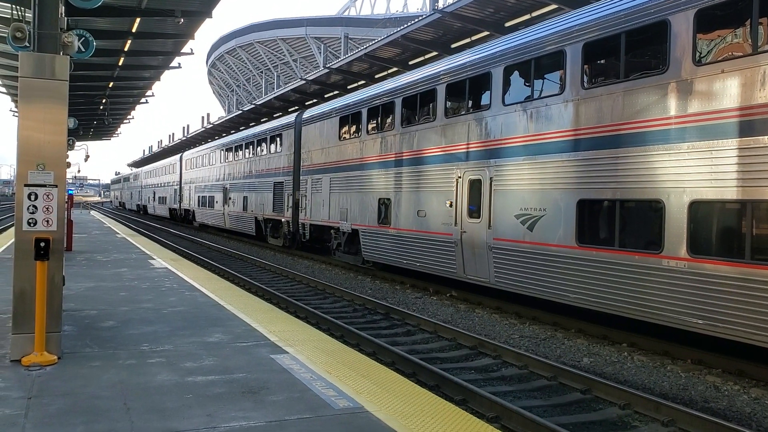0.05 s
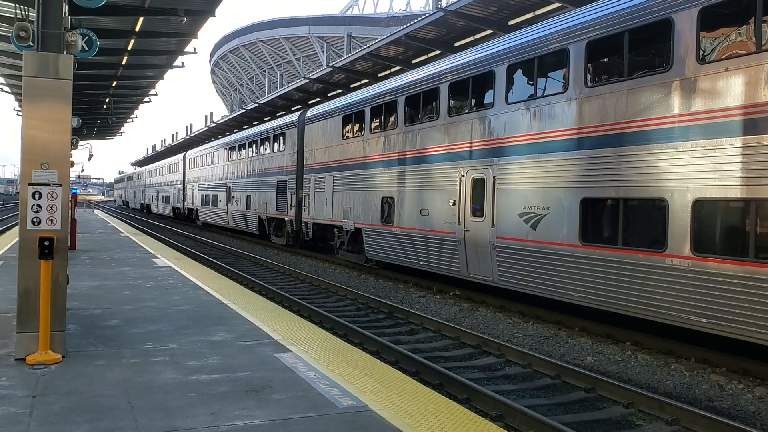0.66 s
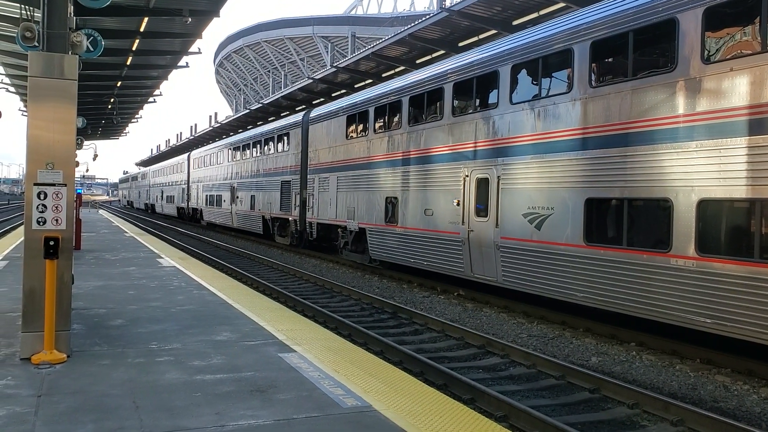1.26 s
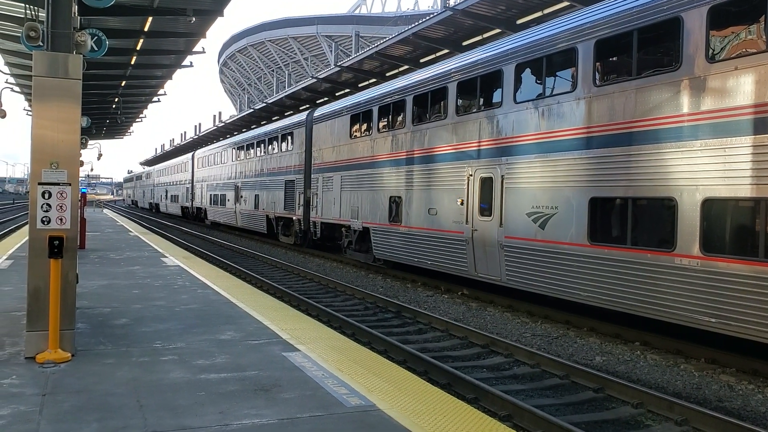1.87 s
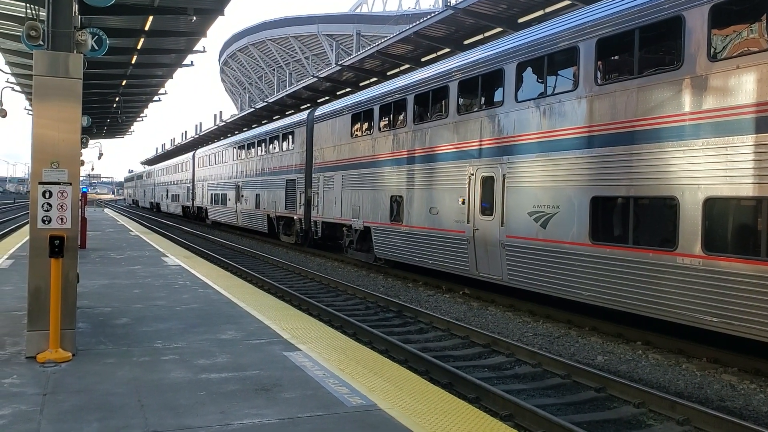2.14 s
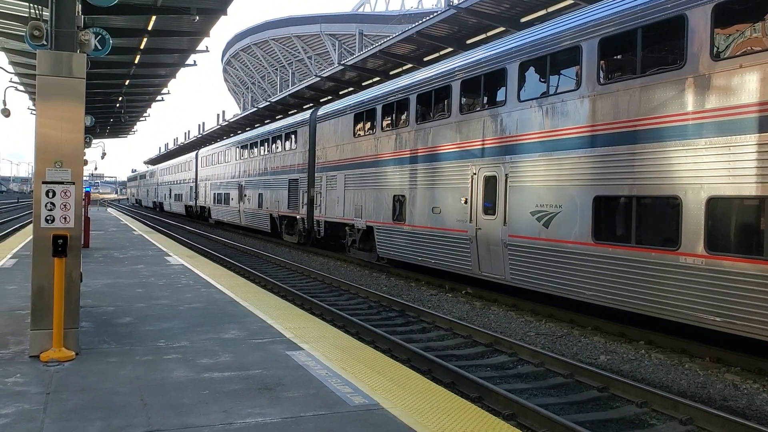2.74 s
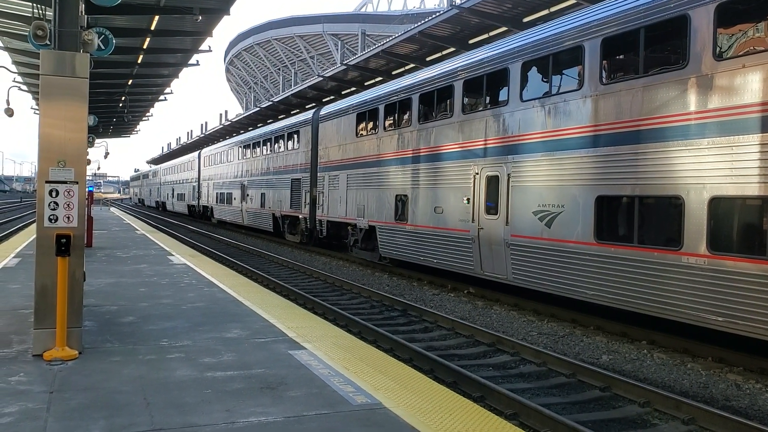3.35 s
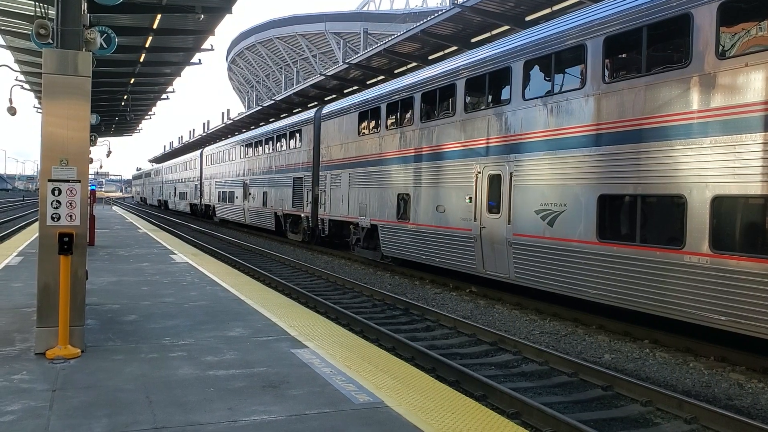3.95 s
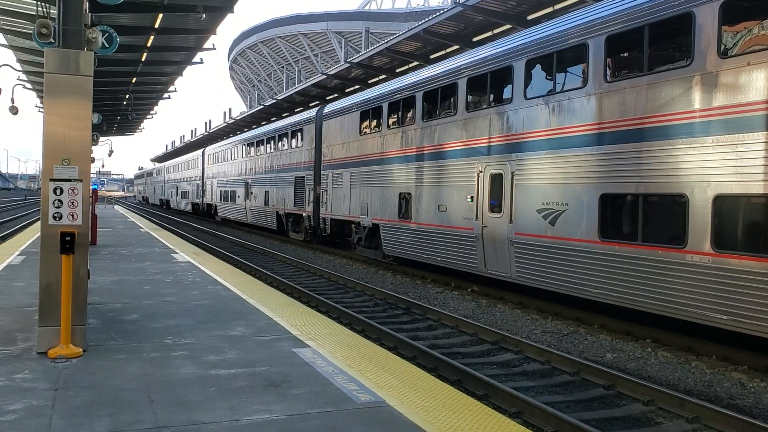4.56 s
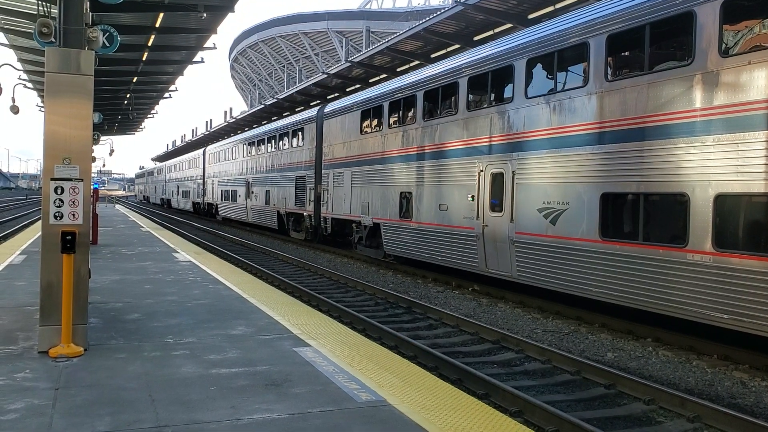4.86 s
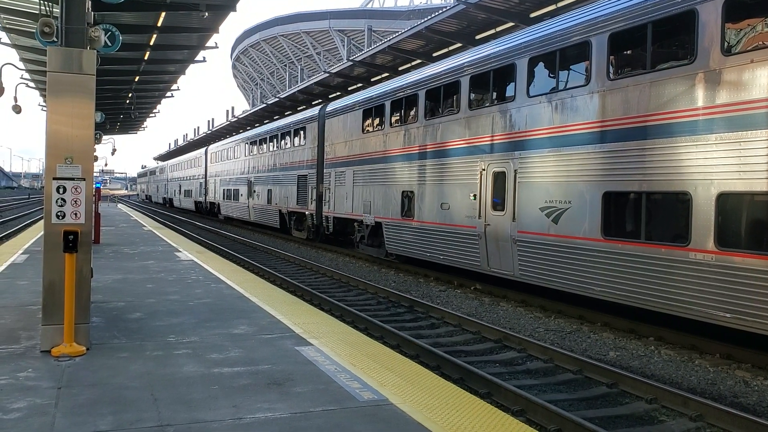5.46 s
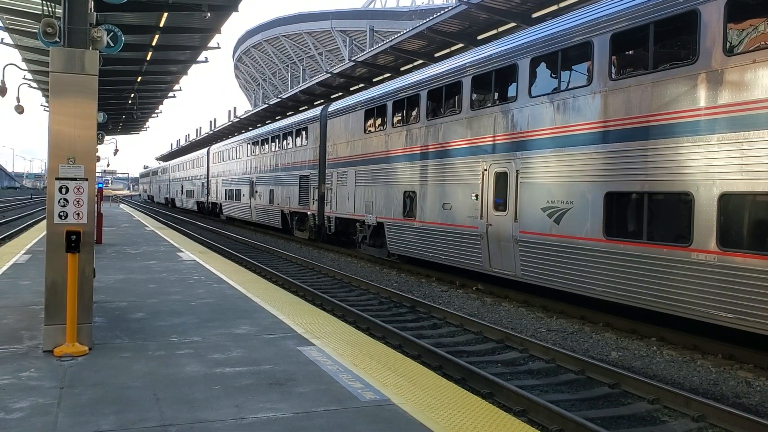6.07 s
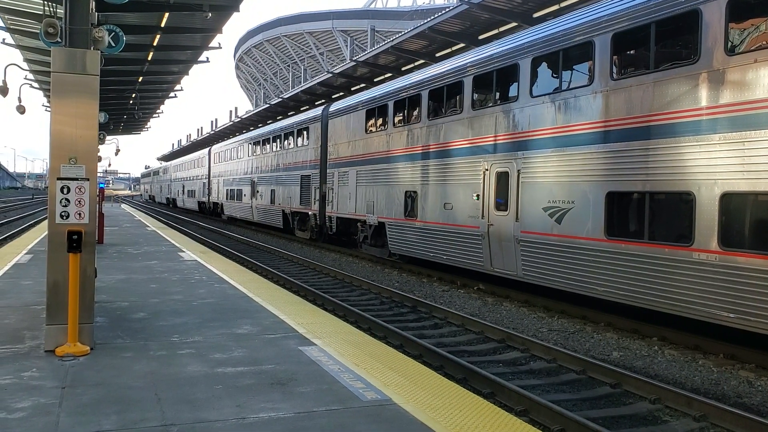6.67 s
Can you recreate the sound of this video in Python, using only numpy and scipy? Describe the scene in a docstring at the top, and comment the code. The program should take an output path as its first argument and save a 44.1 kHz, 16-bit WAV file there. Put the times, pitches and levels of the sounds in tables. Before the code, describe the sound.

An idling diesel train throbs and hums steadily while a whistling air leak fades away and a valve gives a few short spits.

```python
"""Two diesel engines of a passenger train idle beside a roofed station platform.
Their exhaust pulses beat in the bass, under the rush, hum and whine of the cars' blowers.
To the left, leaking compressed air hisses and whistles in a cavity, fading to a sizzle at the seal
as the pressure falls. A valve spits and vents, ringing its body. A thin squeal comes and goes."""
import sys
import numpy as np
from scipy import signal
from scipy.fft import rfft, irfft
from scipy.io import wavfile

SR = 44100
rng = np.random.default_rng(int(sys.argv[2]) if len(sys.argv) > 2 else 0)


def digitize_waveform(pressure):
    """Quantize a signal to 16-bit integers and store it at the path in sys.argv[1].

    Rows of a 2-D input are taken as channels; values are limited to [-1, 1].
    """
    field = np.atleast_2d(pressure).T
    bounded = np.clip(field, -1, 1)
    quanta = np.round(bounded * 32767).astype(np.int16)
    wavfile.write(sys.argv[1], SR, quanta)


N = 295778
T = np.arange(N) / SR
HZ = np.maximum(np.arange(N // 2 + 1) * SR / N, 1)


# Near engine, uneven cylinders: multiple of cycle rate, level/dB
EXHAUST_ORDERS = [(7, -43), (8, -36.5), (11, -26.3), (12, -32), (13, -31.5), (15, -43), (17, -46)]

def engines(cycle_hz=5.9973, firing_hz=56.705, first_throb_s=.0969, jitter_s=.0002):
    """Exhaust pulses swell once a cycle and beat against the second engine's firing note."""
    clock_s = T - first_throb_s + jitter_s * drift(.93)
    exhaust = sum(from_db(db + .7 * drift(2)) * np.cos(2 * np.pi * order * cycle_hz * clock_s)
                  for order, db in EXHAUST_ORDERS)
    second_engine = from_db(-24.5 + drift(1.3)) * np.cos(2 * np.pi * firing_hz * clock_s)
    return np.sqrt(2) * (exhaust + second_engine) * pan(lean_db=.9)


# Blower rumble and rush: f/Hz, density/(dB per Hz)
BLOWER_RUMBLE = [(20, -72), (36, -51), (55, -49), (85, -46.5), (115, -51.5), (145, -54), (210, -52.5),
                 (270, -59), (400, -63), (520, -65.5), (680, -66), (1000, -75), (1600, -84.5)]
BLOWER_RUSH = [(300, -84), (900, -71.5), (1500, -73), (2100, -77), (2800, -82), (3400, -81.5),
               (4500, -92.5), (6000, -96), (7800, -106), (10800, -105), (12000, -121), (15500, -122)]
# Transformers, motors, fan blades: f/Hz, level/dB, wander/Hz
MACHINE_HUMS = [(59.87, -33, 0.057), (71.6, -41, 1.36), (180.1, -42, 0.13), (182.7, -39, 0.438),
                (215.9, -41.5, 0.39), (236.6, -45, .4), (295.8, -48.5, 0.32), (344.5, -50, 0.61),
                (376.8, -53, 1.21), (388, -52.5, 0.34), (412.7, -50, 0.54), (657.6, -55.5, 0.805),
                (722, -67, 0.51), (1271, -60, 1.61)]
# Blower whines: f/Hz, width/Hz, level/dB
BLOWER_WHINES = [(2401, 2.5, -63), (2431, 4, -60.3), (2579, 3, -69), (2638, 3, -67.5), (2934, 8, -71)]
# Balance of the cars' sound: f/Hz, left minus right/dB
CAR_LEAN = [(60, 0.33), (110, 0.46), (200, 2.5), (380, 2.5), (700, 5.5), (1290, 10.4), (2380, 6),
            (4400, 10.7), (8120, 32), (15000, 7.1)]

def blowers(surge_db=.55, waver_db=1.0):
    """Fans under the cars: broad rush, wavering hums, thin whines."""
    density = np.hypot(spectrum(BLOWER_RUMBLE), spectrum(BLOWER_RUSH))
    rush = noise(density, CAR_LEAN) * from_db(surge_db * drift(3.9))
    hums = sum(from_db(db + waver_db * drift(1.8)) * tone(hz, wander_hz) * pan(at_hz(CAR_LEAN, hz))
               for hz, db, wander_hz in MACHINE_HUMS)
    whines = noise(resonances(BLOWER_WHINES), CAR_LEAN)
    return rush + hums + whines


def pressure_db(bleed_db_per_s=4):
    """Pressure behind the leak, re its start; bleeds away steadily."""
    return -bleed_db_per_s * T


# Leak jet: f/Hz, relative density/dB
LEAK_HISS = [(2500, -7), (3300, 11), (4400, 8), (5100, 9.5), (5800, 7), (6600, 1), (8600, -4.5),
             (9800, -1.5), (11000, 3), (12200, -3), (14000, 0), (15000, 1.5), (16000, -1)]
# Cavity resonances: f/Hz, width/Hz, relative level/dB
CAVITY_MODES = [(2330, 170, -12), (3600, 260, -5.3), (3573, 20, -16), (3800, 160, -4.6), (3788, 10, -12),
                (3860, 10, -14), (3976, 10, -16), (3970, 80, -10.5)]
# Balance of the escaping air: f/Hz, left minus right/dB
LEAK_LEAN = [(2000, 7), (3000, 8), (3800, 14), (4700, 8), (6000, 16), (8000, 24), (9800, 13), (12000, 14),
             (15000, 17)]

def air_leak(hiss_db=-88.5, whistle_db=-39.5, dull_above_hz=11700, stall_db=-8):
    """The jet dulls as it weakens and blows a cavity, whose whistle stalls at low pressure."""
    drive_db = pressure_db()
    density = spectrum(LEAK_HISS)
    jet_body = noise(density * (HZ <= dull_above_hz), LEAK_LEAN)
    jet_top = noise(density * (HZ > dull_above_hz), LEAK_LEAN) * from_db(.27 * drive_db)
    hiss = (jet_body + jet_top) * from_db(hiss_db + drive_db + .6 * drift(20))
    stall_loss_db = 1.5 * np.maximum(stall_db - drive_db, 0)
    cavity = noise(resonances(CAVITY_MODES), LEAK_LEAN)
    whistle = cavity * from_db(whistle_db + drive_db - stall_loss_db + .5 * drift(7.6))
    return hiss + whistle


# Spits: t/s, relative level/dB, opening/s, hold/s, T60/s, ring gain/dB
VALVE_SPITS = [(2.25, -63, .004, .005, 0.17, -6), (3.62, -69, .03, .15, .5, -6),
               (4.554, -59, .003, .006, 0.2, -5), (5.984, -59, 0.032, 0.19, 2.3, -.5),
               (6.22, -59, .005, 0.015, 0.15, -2), (6.547, -59, .012, 0.034, 0.32, -2)]
# Valve jet: f/Hz, relative density/dB
VALVE_HISS = [(900, 5), (2000, 22), (3000, 12), (4500, 9), (5500, 14), (6200, 9), (7300, 0), (9300, 2.5),
              (10600, 2), (12000, -1), (15500, 2)]
# Valve body resonances: f/Hz, width/Hz, relative level/dB
VALVE_MODES = [(5060, 35, 1), (5520, 140, 6), (10550, 220, 0)]

def valve(jet_db=-37, ring_db=-4, crack_s=.021):
    """Each spit opens, holds and bleeds away; the body rings hardest as the seat cracks open."""
    jet_power = ring_power = 0
    for start_s, db, opening_s, hold_s, t60_s, ring_gain_db in VALVE_SPITS:
        age_s = np.maximum(T - start_s, 0)
        fade_db = 60 * np.maximum(age_s - hold_s, 0) / t60_s
        flow = np.minimum(age_s / opening_s, 1) * from_db(db - fade_db)
        crack = 1 + 2 * np.exp(-age_s / crack_s)
        jet_power += flow ** 2
        ring_power += (flow * crack * from_db(ring_gain_db)) ** 2
    jet = noise(spectrum(VALVE_HISS), LEAK_LEAN) * from_db(jet_db + drift(25))
    ring = noise(resonances(VALVE_MODES), LEAK_LEAN) * from_db(ring_db + drift(12))
    return jet * np.sqrt(jet_power) + ring * np.sqrt(ring_power)


# Squeal flares: centre t/s, length/s, relative level/dB
SQUEAL_FLARES = [(1.81, 0.055, -51), (1.91, .09, -53.5), (2.82, 0.046, -53), (3.05, 0.15, -53),
                 (3.28, 0.14, -52.5), (4.688, .16, -54), (6.42, .14, -53)]

def squeal(pitch_hz=3240, width_hz=17, floor_db=-58, direct_db=-2.5, scattered_db=-4):
    """A soft, fluttering note that flares, heard directly and blurred by roof reflections."""
    flare_power = sum(from_db(db) ** 2 * np.exp(-(2 * (T - centre_s) / length_s) ** 2)
                      for centre_s, length_s, db in SQUEAL_FLARES)
    envelope = np.sqrt(from_db(floor_db) ** 2 + flare_power)
    direct = from_db(direct_db) * tone(pitch_hz, wander_hz=5) * pan(at_hz(CAR_LEAN, pitch_hz))
    scattered = noise(resonances([(pitch_hz, width_hz, scattered_db)]), CAR_LEAN)
    flutter = from_db(2.2 * drift(16))
    return (direct + scattered) * envelope * flutter


# Air seeping through the seal: f/Hz, width/Hz, relative level/dB
SEAL_BAND = [(9620, 190, -73)]

def seal_seep(gain_db=-.5, onset_pressure_db=-4):
    """At low pressure the seal sizzles on one high, flickering note."""
    onset = 1 / (1 + from_db(pressure_db() - onset_pressure_db) ** 2)
    flicker = from_db(3.8 * drift(22))
    return noise(resonances(SEAL_BAND), LEAK_LEAN) * from_db(gain_db) * onset * flicker


# Stereo likeness of the noise: f/Hz, left-right correlation
CORRELATION = [(40, .85), (130, .92), (290, .81), (640, .47), (1400, .05), (16000, 0)]

def noise(density, lean):
    """Stereo noise of given amplitude per root Hz; alike in the bass, diffuse in the treble."""
    mid, side = rfft(rng.standard_normal((2, N)))
    alike = np.clip(at_hz(CORRELATION), -.99, .995)
    pair = np.sqrt((1 + alike) / 2) * mid + np.sqrt((1 - alike) / 2) * side * [[1], [-1]]
    return irfft(pair * density * pan(at_hz(lean)) * np.sqrt(SR / 2), N)


def spectrum(points):
    """Amplitude per root Hz; falls 24 dB/octave beyond the end points."""
    beyond = np.maximum(1, np.maximum(points[0][0] / HZ, HZ / points[-1][0]))
    return from_db(at_hz(points)) / beyond ** 4


def resonances(modes):
    """Amplitude per root Hz of steep-sided peaks, each with its own rms level."""
    power = 0
    for hz, width_hz, db in modes:
        peak = 1 / (1 + ((HZ - hz) / width_hz) ** 2) ** 2
        power += from_db(db) ** 2 * peak / (width_hz * np.pi / 2)
    return np.sqrt(power)


def tone(hz, wander_hz):
    """Unit-power sinusoid of wandering pitch."""
    cycles = rng.random() + np.cumsum(hz + wander_hz * drift(2.01)) / SR
    return np.sqrt(2) * np.cos(2 * np.pi * cycles)


def drift(rate_hz):
    """Slow random motion: twice-smoothed noise, unit rms."""
    hop, settle_steps = 100, 2000
    pole = np.exp(-2 * np.pi * rate_hz * hop / SR)
    white = rng.standard_normal(N // hop + settle_steps + 2)
    slow = signal.lfilter([1], [1, -2 * pole, pole ** 2], white)[settle_steps:]
    slow /= np.sqrt(np.mean(slow ** 2))
    return np.interp(np.arange(N) / hop, np.arange(len(slow)), slow)


def pan(lean_db):
    """Left and right gains, constant total power."""
    gains = from_db(np.array([[.5], [-.5]]) * lean_db)
    return gains / np.sqrt(np.mean(gains ** 2, axis=0))


def at_hz(points, hz=HZ):
    """Interpolate on a log-frequency axis."""
    freqs_hz, values = np.transpose(points)
    return np.interp(np.log(hz), np.log(freqs_hz), values)


def from_db(db):
    """Decibels to gain."""
    return 10 ** (np.asarray(db) / 20)


def scene():
    """The train as heard from the platform."""
    return engines() + blowers() + air_leak() + valve() + squeal() + seal_seep()


def record(dry):
    """Steep elliptic low-pass."""
    cutoff_hz = 15650
    return signal.sosfilt(signal.ellip(12, .1, 90, cutoff_hz, fs=SR, output="sos"), dry)


dry = scene()
out = record(dry)
digitize_waveform(out)
```